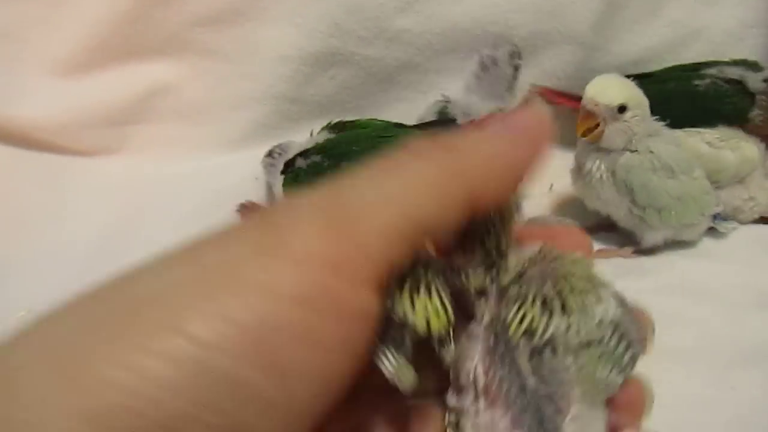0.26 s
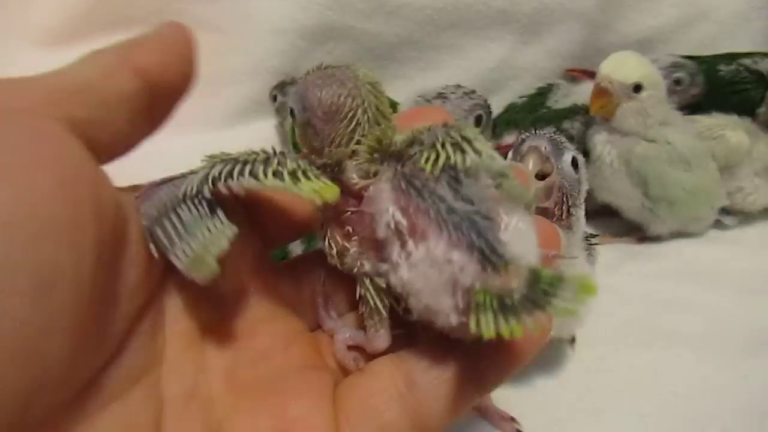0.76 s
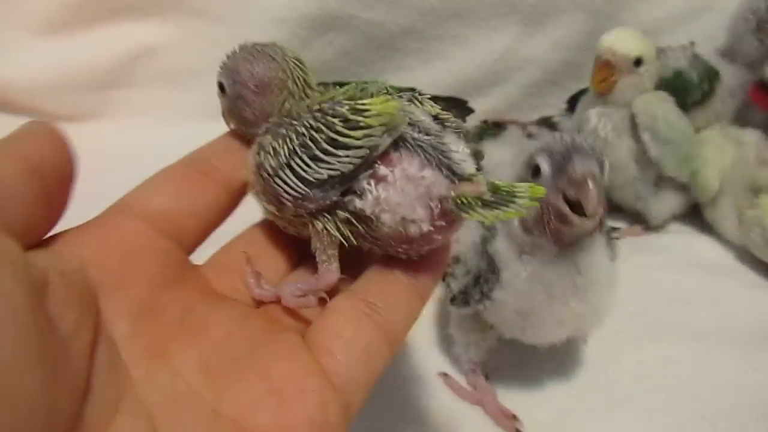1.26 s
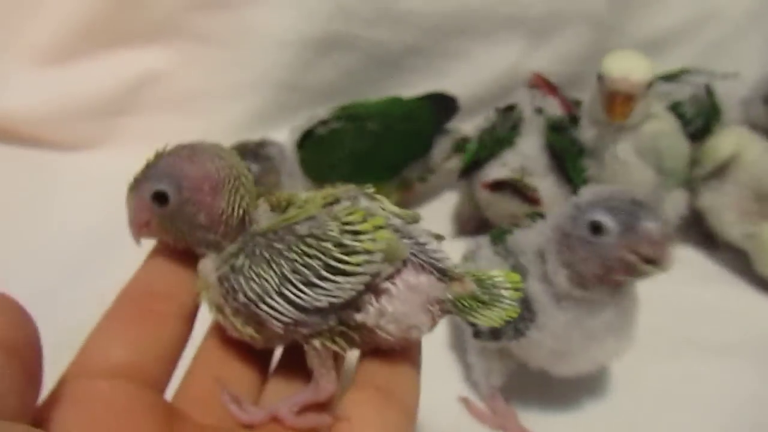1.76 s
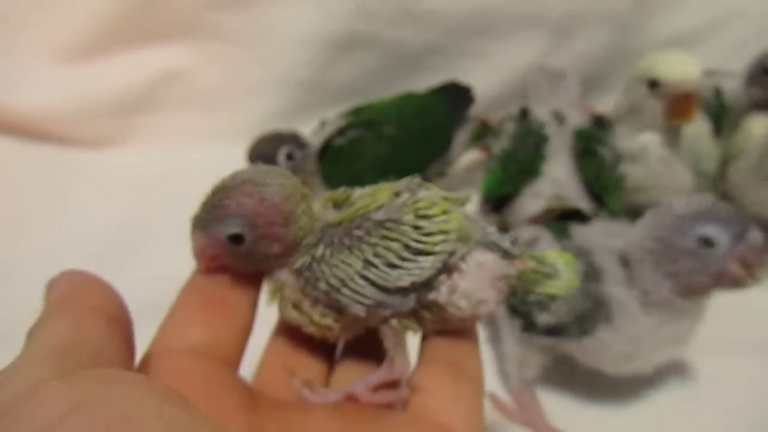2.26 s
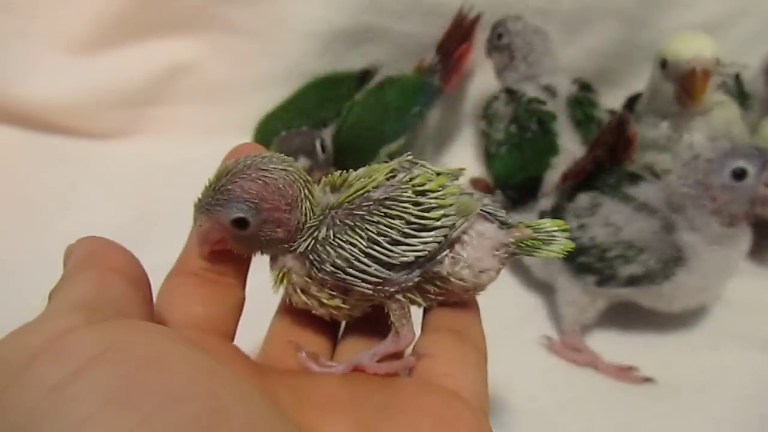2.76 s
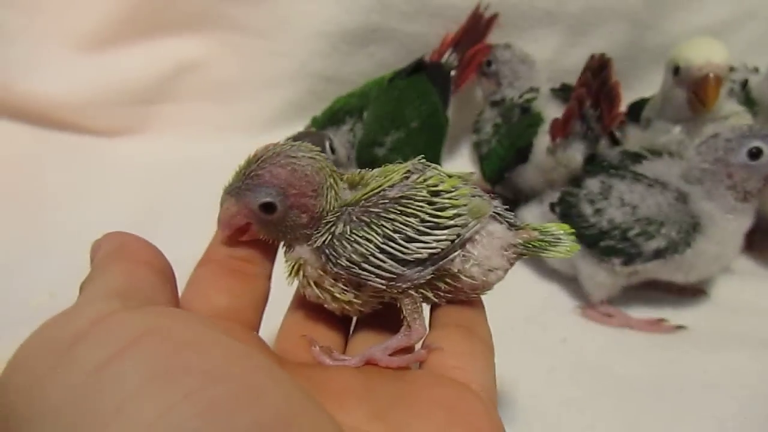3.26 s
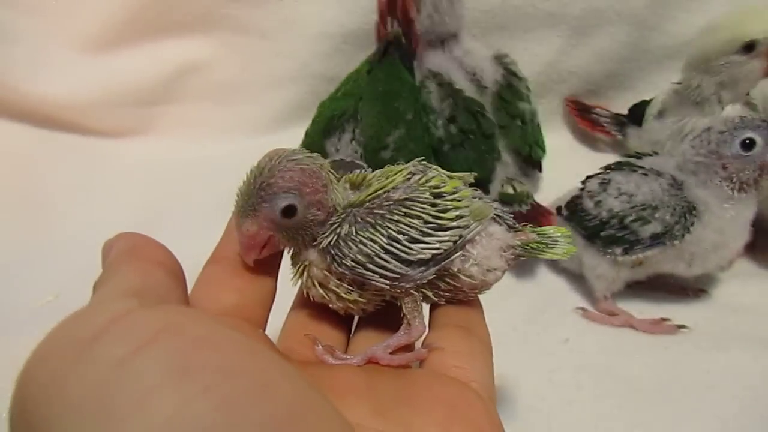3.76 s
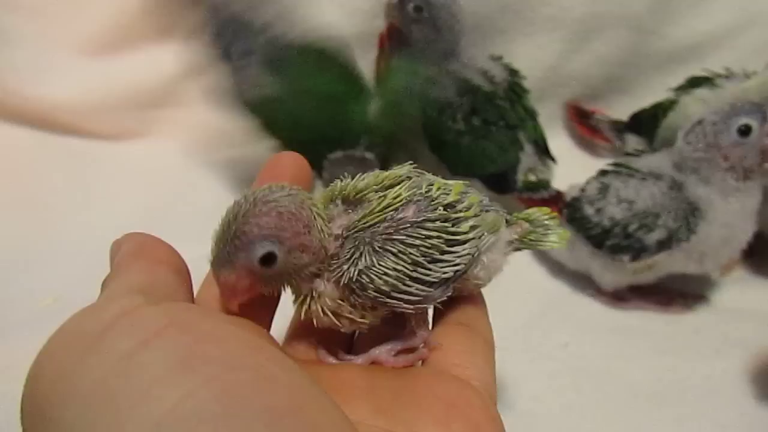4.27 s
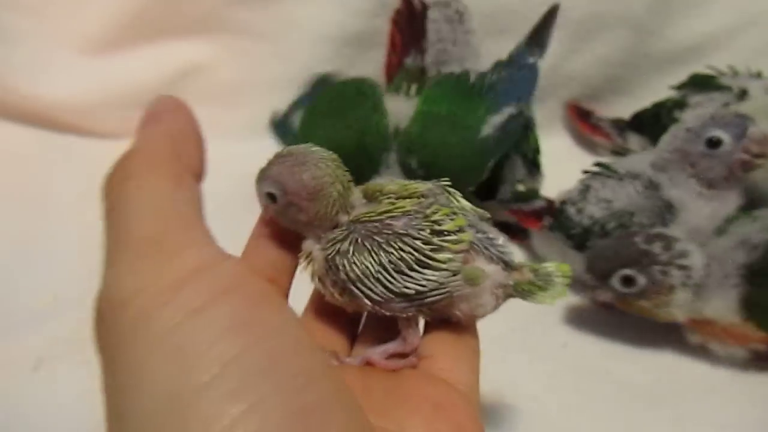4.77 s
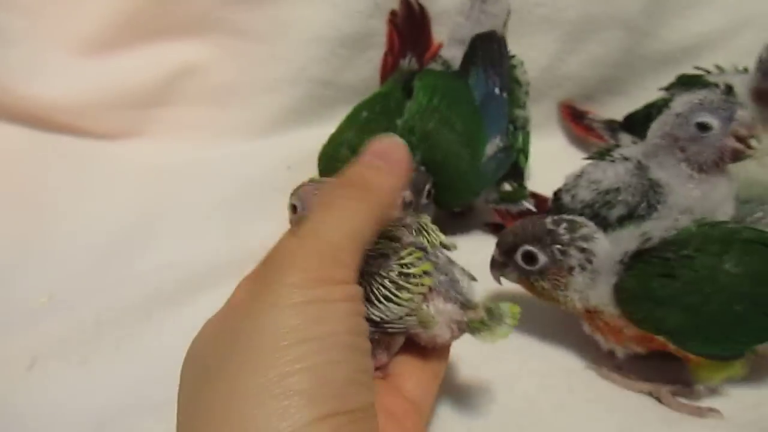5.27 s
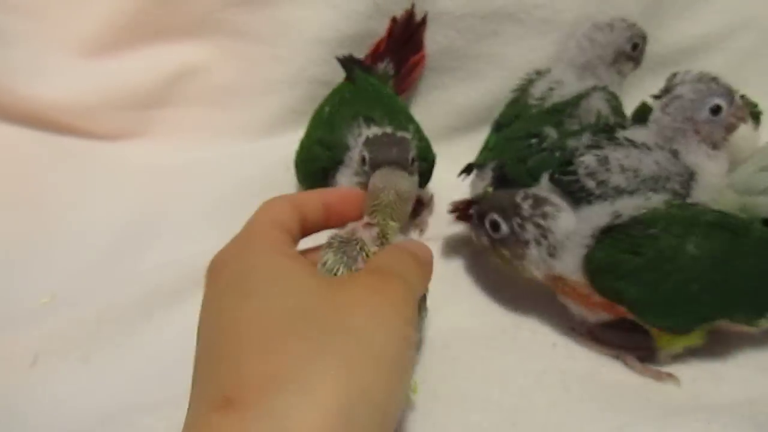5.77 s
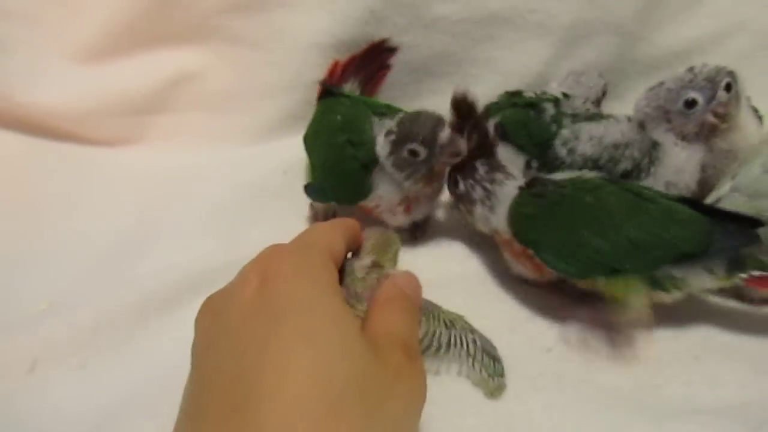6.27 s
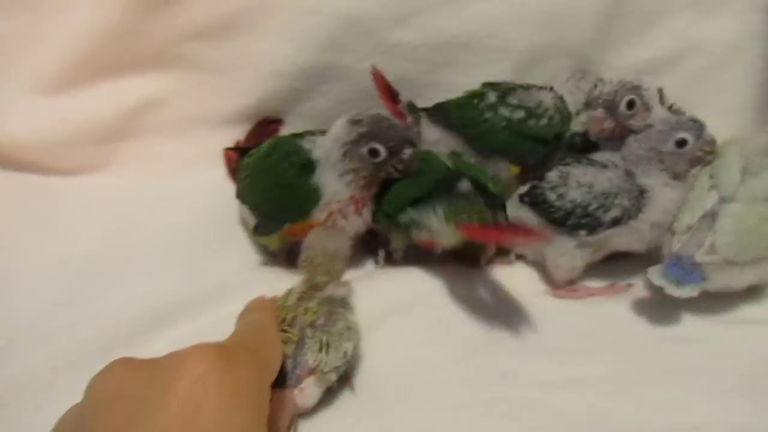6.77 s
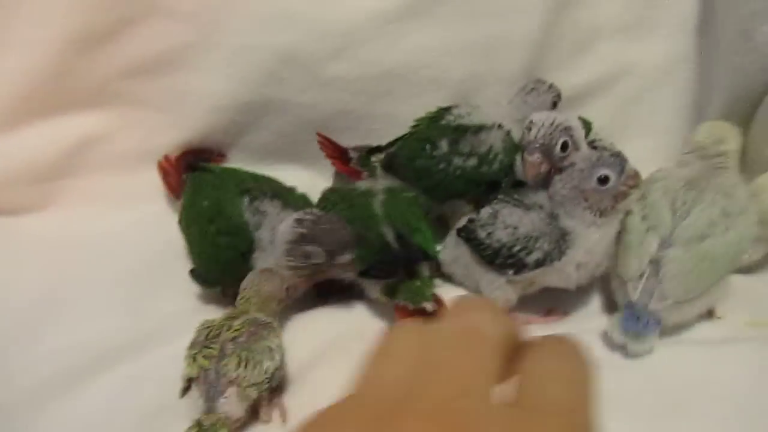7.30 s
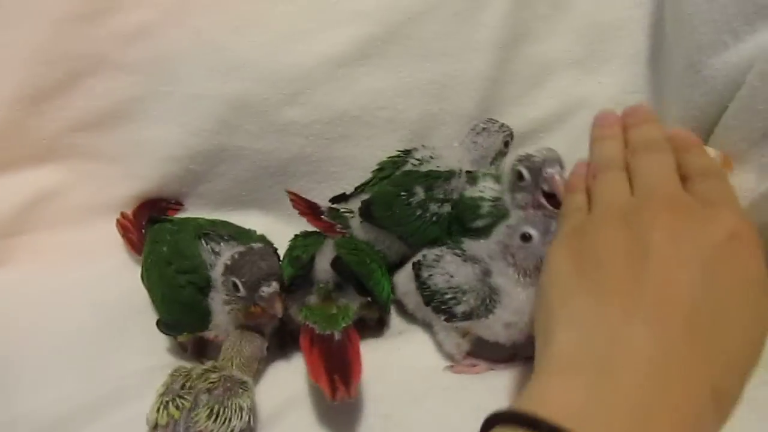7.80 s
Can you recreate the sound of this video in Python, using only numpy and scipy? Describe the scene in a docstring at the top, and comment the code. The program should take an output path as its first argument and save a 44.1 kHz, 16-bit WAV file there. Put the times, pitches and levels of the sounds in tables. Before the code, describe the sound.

Begging parrot chicks, close to the microphone in a small room with faint steady hiss. It opens mid-squawk: harsh, raspy notes follow one another until about 0.3 s, then two short clearer cries, and weak thin whines near 0.6 s. From 0.95 to 1.3 s comes a dense, very loud, piercing run with croaky low notes between, then small cries and a softer squawk near 1.6 s. After a pause, a whine rises and falls at 2.2 s into four rasping squawks until 2.7 s. Soft cloth taps and an isolated whine at 3.2 s precede another four squawks, 3.85-4.15 s. A whine at 4.6 s and muffled shuffling and thuds around 4.4-5 s lead to a rapid cluster from 5.2 to 5.7 s. More raspy groups come at 6.25-6.7 s and 6.9-7.2 s, then bright, loud squawks from 7.55 to 7.85 s and two weaker, rougher ones by 8 s.

```python
"""Begging parrot brood

A brood of young parrots begs on a cloth in a small room, close to the microphone, with a hand among them.
Whines, cries and squawks are pulse trains from a syrinx, ringing in the resonances of throat and beak:
thin gliding whines, short arching cries, and harsh arching squawks, the loudest clipped by the recorder.
Feet and fingers make filtered-noise taps and shuffles on the bedding, over steady room noise and hiss."""
import sys
import numpy as np
from scipy import signal
from scipy.fft import rfft, irfft
from scipy.io import wavfile
from scipy.ndimage import uniform_filter1d, map_coordinates

SR = 44100
rng = np.random.default_rng(int(sys.argv[2]) if len(sys.argv) > 2 else 0)


def master(y):
    """Save y as 16-bit WAV."""
    cut = np.clip(np.atleast_2d(y).T, -1, 1)
    pcm = np.round(cut * 32767)  # scale
    wavfile.write(sys.argv[1], SR, pcm.astype(np.int16))


N = 354519

# spectrum of the room noise: f/Hz, relative density level/dB
NOISE_SPECTRUM = [(20, -16), (45, -7), (90, 0), (180, -0.5), (400, -4), (700, -7.5), (1500, -11.5),
                  (3000, -15.5), (4000, -25.5), (6000, -17.5), (9000, -23.5), (11500, -28), (15000, -50.5)]
# stereo width of the room noise: f/Hz, side over mid level/dB
NOISE_WIDTH = [(60, 3.5), (140, 9.5), (320, 10.5), (750, 6), (1730, 3), (4010, -10.5), (9280, -4)]
# rumble of shuffling on the cloth: t/s, relative level/dB
SHUFFLE = [(0.0, -57), (0.65, -62), (1.07, -60.5), (1.34, -66), (2.59, -66), (2.87, -68.5), (4.45, -58.5),
           (4.95, -51), (5.96, -61.5), (6.33, -52.5), (7.57, -53.5), (8.04, -61)]
# decay of the room's tail: f/Hz, T60/s
ROOM_T60 = [(500, 0.27), (2000, 0.26), (6000, 0.19), (14000, .22)]
# taps on the bedding: t/s, thud relative level/dB, claw tick relative level/dB
TAPS = [(2.726, -44.5, -68.5), (2.912, -47, -71), (3.487, -40.5, -63.5), (3.527, -66.5, -42.5),
        (4.419, -49, -51), (4.434, -39, -42.5), (4.784, -43, -61.5), (4.881, -35, -58), (4.927, -55, -43.5),
        (5.002, -44, -51), (5.044, -41, -61.5), (7.299, -43.5, -51), (7.475, -40, -46)]

# resonances of throat and beak, nearly shut and wide open: f/Hz, level/dB
NARROW_BEAK = [(300, -44.5), (600, -5), (950, -2.5), (1400, -5.5), (2300, -4.5), (3700, -9), (5600, -1),
               (7000, -4), (9000, -18), (12000, -39), (16000, -60)]
OPEN_BEAK = [(300, -40.5), (570, -19.5), (800, -3), (980, -2), (1270, -15.5), (1700, -6), (2200, -11),
             (3250, 1.5), (4100, -10.5), (5150, -0.5), (6700, -3), (8200, -9.5), (10000, -20.5),
             (16000, -46)]
THROAT_HZ = 3250  # main resonance of the open beak as tabled
VOICE_LOW_HZ = 400  # the small throats give little below this

# rising whines: start t/s, end t/s, shelf pitch f/Hz, level/dB, brightness level/dB
RISING_WHINES = [(.574, .603, 2277, -34, -9.5), (2.193, 2.234, 2160, -26, 0),
                 (3.19, 3.228, 2286, -31.5, -1), (3.725, 3.775, 3040, -30, -4.5),
                 (4.533, 4.573, 2170, -27.5, -3.5), (5.111, 5.17, 2222, -28, -5.5),
                 (5.788, 5.834, 2340, -34, -4), (6.953, 6.978, 2530, -27, -3.5),
                 (7.492, 7.529, 2280, -29, -6)]
RISE_FROM, RISE_TO = .5, 1.22  # first and last pitch as shares of the shelf pitch
RISE_RASP, RISE_END_RASP, RISE_SWELL_DB = .99, .096, 3.0  # it clears and grows as it climbs
# falling whines: start t/s, end t/s, first pitch f/Hz, level/dB, start-to-end swell level/dB,
# brightness level/dB
FALLING_WHINES = [ (0.609, 0.687, 2550, -34.5, 6.5, -6), (0.692, .722, 2430, -33.5, -3, -3.5),
                  (0.929, 0.95, 2400, -22, 8.5, 0), (1.3, 1.325, 2684, -34, -10, -18),
                  (1.575, 1.594, 2300, -27, 16, -3), (1.648, 1.687, 2395, -34.5, -1, -2.5),
                  (2.241, 2.323, 2663, -23.5, 6.5, 2), (2.501, 2.525, 2630, -28.5, -1, 0),
                  (3.237, 3.312, 2613, -27, 6.5, 4), (3.316, 3.344, 2426, -26, 1, 4),
                  (3.766, 3.801, 2200, -37, -5.5, -15), (3.924, 3.975, 2410, -30, 6, 1),
                  (4.586, 4.664, 2367, -24, 1.5, 3), (4.674, 4.693, 1997, -37, -2, -3),
                  (5.176, 5.242, 2616, -26, -2, -1.5), (6.504, 6.529, 2640, -31.5, -4, -2),
                  (6.984, 7.002, 2600, -25.5, 6, 3), (7.065, 7.09, 2230, -31, 5, -4),
                  (7.538, 7.574, 2594, -30.5, -7, -6)]
REST_HZ, SAG_S = 1714, .021  # pitch it sags towards, and the time constant
FALL_RASP, RASP_AFTER_S, RASP_PER_S = .08, .0072, 14  # it starts nearly clean and then frays
RALLY_AFTER_S, RALLY_HZ_PER_S = .064, 22000  # if it lasts, an upward glide joins in

# short arching cries, mostly clear: start t/s, end t/s, top pitch f/Hz, droop at the start/share,
# level/dB, rasp/0-1, brightness level/dB
CRIES = [(0.117, 0.16, 1622, 0.06, -20, 0, -12), (0.359, 0.406, 1317, 0.38, -14.5, 0.14, -3.5),
         (0.454, .49, 1293, 0.38, -16.5, 0.1, -5), (1.39, 1.429, 1550, .17, -24.5, .03, -12),
         (1.468, 1.535, 1242, .16, -16, .1, 1.5), (3.798, 3.838, 2780, 0.35, -29.5, 0.35, -4),
         (5.876, 5.909, 1790, 0.3, -32.5, 1, -2), (6.175, 6.226, 3200, 0, -42, 0.7, -5.5)]
CRY_CREST, CRY_END_DROOP = .48, 1.2  # crest as share of the length; end droop over start droop

# squawks: start t/s, end t/s, top pitch f/Hz, level/dB, start-to-end swell level/dB, rasp drive/0-1,
# period doubling drive/0-1, brightness level/dB, main throat resonance f/Hz
SQUAWKS = [ (-.03, .034, 1640, -9.5, -11, 0.88, 0.45, -1, 3190),
           (.055, .15, 1697, -10.5, -5, .8, 0.18, -1.5, 3210),
           (.16, 0.221, 1738, -15, 5.5, 0.74, .29, -2, 3260),
           (0.224, 0.318, 1928, -17, 7.5, 0.83, 0.2, -4, 3170),
           (0.941, .998, 1712, -13, -5.5, 0.68, 0.16, -1.5, 3240),
           (.997, 1.072, 1915, -6.5, 2, .24, 0.5, 4, 3210),
           (1.065, 1.108, 555, -19, 2, 0.23, 0.24, -5, 3230),
           (1.104, 1.158, 1922, -6, 3, .38, 0.3, 5, 3190),
           (1.166, 1.205, 890, -18, 6.5, 0.87, .1, 3.5, 3080), (1.2, 1.26, 1886, -7, -1, .44, 0.2, 4, 3233),
           (1.262, 1.33, 560, -30, -8, .2, 0, -8, 3200),
           (1.278, 1.314, 1671, -23, 10.5, 0.73, 0.2, -1, 3200),
           (1.584, 1.657, 1547, -17, -0.5, .3, 0.17, -3, 3370),
           (2.312, 2.377, 1700, -10.5, -2, 0.8, 0.26, .5, 3310),
           (2.416, 2.485, 1677, -9.5, -0.5, 0.6, .2, 1, 3300),
           (2.524, 2.621, 1784, -11.5, 0.5, 0.6, .22, 1.5, 3320),
           (2.631, 2.693, 1836, -12, 6.5, .62, 0.46, 5.5, 3230),
           (3.853, 3.929, 1658, -11, -6, 0.9, 0.25, 0.5, 3250),
           (3.968, 4.056, 1671, -12.5, -6.5, 0.7, 0.2, 1, 3260),
           (4.07, 4.143, 1882, -11.5, 1, 0.8, .16, 1.5, 3300),
           (4.198, 4.266, 1756, -13.5, 1.5, 0.67, 0.2, 0.5, 3080),
           (5.24, 5.343, 1613, -12.5, -6, 0.71, 0.22, 1.5, 3280),
           (5.355, 5.412, 1685, -13.5, 1, 0.83, 0.14, 2.5, 3240),
           (5.408, 5.456, 2052, -10, 1, .18, 0.3, 5, 3290),
           (5.463, 5.518, 1590, -14, 2, 0.5, .13, 2.5, 3200),
           (5.517, 5.594, 1673, -10, -1, .41, .05, 4, 3295),
           (5.636, 5.7, 1737, -11.5, -5.5, 0.26, 0.14, 7, 3420),
           (6.244, 6.311, 1683, -14.5, 4, 0.67, 0.04, -2, 3370),
           (6.351, 6.408, 1738, -13.5, 5, 0.83, 0.03, -2.5, 3360),
           (6.404, 6.466, 1662, -16, 2.5, 0.76, 0.7, 2, 3110),
           (6.457, 6.505, 1650, -14.5, -0.5, 0.62, 0.04, -4.5, 3320),
           (6.526, 6.586, 1814, -10.5, 2, 0.63, 0.3, 5, 3280),
           (6.664, 6.689, 743, -20, 1, 0.12, 0.03, -5, 3190),
           (6.887, 6.959, 1667, -12, -5.5, 0.67, 0, 0.5, 3540),
           (6.998, 7.06, 1690, -12, -2.5, 0.73, 0, 1.5, 3420),
           (7.109, 7.17, 1586, -14.5, -4, 0.76, 0, 0, 3310),
           (7.566, 7.628, 1676, -7.5, -4, 0.37, 0.5, 6.5, 3350),
           (7.684, 7.743, 1800, -9, -1, 0.25, 0.57, 9.5, 3150),
           (7.79, 7.852, 1746, -7, 5.5, 0.52, 0.18, 5, 3240),
           (7.893, 7.947, 1652, -20, 1, 1, 0.3, 1.5, 3140),
           (7.987, 8.063, 1717, -19, -0.5, 1, 0.35, -1.5, 3270)]
# weight of the squawks' low partials: t/s, level/dB
CHEST = [(0, -5), (1.3, -3), (2.5, -2.5), (4, -1), (5.4, -0.5), (5.6, 3), (6.35, -1), (7.1, 1.5), (8, -1)]
# where the squawking bird sits: t/s, left over right level/dB
PAN = [(0, 0.2), (1, 0), (2.6, -0.5), (3.9, 0.5), (5.35, -0.8), (5.6, 0.5), (6.35, -0.5), (6.9, .5),
       (7.8, 0.1)]
# the arch: central pitch of its feet, central place of its crest (0-1), flatness of its top
EDGE_HZ, CREST, FLATNESS = 780, .57, 3.2
# largest shift of the crest (share of the length) and of the starting croak (share of its pitch)
CREST_SPREAD, EDGE_SPREAD = .14, .12
LOCK_S, LOCK_DEPTH = .012, .45  # averaging time of the beat's regularity, and its swing of the rasp

CUTOFF_HZ = 15700  # top of the recorder's range


def from_db(db):
    """Decibels to gain."""
    return 10 ** (np.asarray(db) / 20)


def rms_one(x):
    """Scale to unit power."""
    return x / np.sqrt(np.mean(x ** 2) + 1e-20)


def at_hz(points, hz):
    """Read a table along log frequency."""
    points = np.array(points)
    return np.interp(np.log(np.maximum(hz, 1)), np.log(points[:, 0]), points[:, 1])


def band(x, low_hz, high_hz):
    """Gentle band-pass."""
    edges = [low_hz, min(high_hz, SR / 2 - 1)]
    return signal.sosfilt(signal.butter(2, edges, "band", fs=SR, output="sos"), x)


def add(out, start, sound):
    """Mix a sound in at a time; what falls outside the scene is dropped."""
    i = int(start * SR)
    sound, i = sound[..., max(0, -i):], max(0, i)
    out[..., i:i + sound.shape[-1]] += sound[..., :max(0, N - i)]


def background(hiss_db=-50.0, shuffle_db=1.0, lumpy_db=3.0):
    """Steady room noise and hiss, wide in the bass, with the lumpy rumble of movement on the cloth."""
    hz = np.fft.rfftfreq(N, 1 / SR)
    mid, side = rfft(rng.standard_normal((2, N))) * from_db(at_hz(NOISE_SPECTRUM, hz))
    side = side * from_db(at_hz(NOISE_WIDTH, hz))
    steady = rms_one(irfft([mid + side, mid - side], N))

    rumble_db = np.interp(np.arange(N) / SR, *np.transpose(SHUFFLE))
    lumps = rms_one(signal.resample(rng.standard_normal(size=200), N))
    lumpy_noise = rng.standard_normal((2, N)) * from_db(lumpy_db * lumps)
    # the swelling is laid on before the band-pass
    rumble = rms_one(band(lumpy_noise, 77, 330))
    return from_db(hiss_db) * steady + from_db(rumble_db + shuffle_db) * rumble


def room(x, wet_db=-11.5, early_db=-11.5, early_t60=.073, gap=.0037):
    """Near surfaces answer almost at once; the walls leave a short tail that dies sooner in the treble."""
    t, edges = np.arange(SR // 2) / SR, np.geomspace(100, 20000, num=9)
    shared, own = rng.standard_normal(len(t)), rng.standard_normal((2, len(t)))
    share = .5
    # the two ports are close together, so only the treble differs between them
    own = band(own, 1500, 18000)
    echoes = (np.sqrt(share) * shared + np.sqrt(1 - share) * own) * (t > gap)
    tail = 0
    for low, high in zip(edges, edges[1:]):
        t60 = at_hz(ROOM_T60, np.sqrt(low * high))
        tail = tail + band(echoes, low, high) * from_db(-60 * t / t60)
    # the same noise backwards serves as a separate early pattern
    early = echoes[:, ::-1] * from_db(-60 * t / early_t60) * (t > gap / 2)
    response = from_db(wet_db) * rms_one(tail) + from_db(early_db) * rms_one(early)
    response = response / np.sqrt(len(t))
    return signal.fftconvolve(x[None], response, axes=1)[:, :N]


def taps(tick_t60=.022, thud_t60=.05, thud_gain_db=1.0, tick_gain_db=1.0):
    """A dull thud through the cloth with the tick of a claw on top: two decaying bands of noise."""
    out, t = np.zeros(N), np.arange(SR // 10) / SR
    for start, thud_db, tick_db in TAPS:
        thud = rms_one(band(rng.standard_normal(len(t)), 100, 340))
        thud = thud * from_db(thud_db + thud_gain_db - 60 * t / thud_t60)
        tick = rms_one(band(rng.standard_normal(len(t)), 600, 2300))
        tick = tick * from_db(tick_db + tick_gain_db - 60 * t / tick_t60)
        add(out, start, thud + tick)
    return out


def syrinx(pitch, doubling, rasp, jitter, waver, shimmer_db=2.0, limp=.1):
    """One sharp pulse per closure; alternate ones come weak and late, and rasp unsettles size and timing."""
    n = len(pitch)
    unsteady = rms_one(uniform_filter1d(rng.standard_normal(n), size=110))
    cycles = np.cumsum(pitch * (1 + waver * np.sqrt(rasp) * unsteady)) / SR
    k = np.arange(1, int(cycles[-1]))
    at = np.interp(k, cycles, np.arange(n))
    rough, weak = rasp[at.astype(int)], doubling[at.astype(int)] * (k % 2)

    # near chaos an uneven pattern of two to five closures recurs, gradually changing
    pattern, memory = rng.integers(2, 6), .68
    feedback = np.r_[1, np.zeros(pattern - 1), -memory]
    uneven = signal.lfilter([np.sqrt(1 - memory ** 2)], feedback, rng.standard_normal((2, n)))
    timing, size = uneven[:, -len(k):]
    at = at + (jitter * rough * timing + limp * weak) * SR / pitch[at.astype(int)]
    strength = (1 - weak) * from_db(shimmer_db * rough * np.clip(size, -2, 2))

    # windowed sincs place each pulse between samples
    near = at.astype(int)[:, None] + np.arange(-7, 9)
    offset = near - at[:, None]
    pulses = strength[:, None] * np.sinc(offset) * np.sinc(offset / 8)
    return np.bincount(np.clip(near, 0, n - 1).ravel(), pulses.ravel(), n)


def throat(pulses, shape, chest_db, bright_db, size=1024):
    """Every pulse rings causally in the resonances of throat and beak; the level is evened."""
    hz = np.fft.rfftfreq(size, 1 / SR)
    tilt = [(1800, chest_db), (2800, 0), (3600, .01), (5000, bright_db)]
    db = at_hz(shape, hz) + at_hz(tilt, hz)
    # folding the cepstrum gives minimum phase, so nothing rings ahead of its pulse
    cepstrum = irfft(np.log(from_db(db)))
    cepstrum[1:size // 2] *= 2
    cepstrum[size // 2 + 1:] = 0
    ringing = irfft(np.exp(rfft(cepstrum)))
    voice = signal.fftconvolve(pulses, ringing)[:len(pulses)]
    return voice / np.sqrt(uniform_filter1d(voice ** 2, size=400) + 1e-12)


def gate(stage, length, attack, release):
    """The air flow starts and stops within milliseconds."""
    return np.clip(stage * length / attack, 0, 1) * np.clip((1 - stage) * length / release, 0, 1)


def flutter(n, depth_db):
    """Quick uneven throbbing of the air flow, from smoothed noise."""
    smooth_walk = uniform_filter1d(np.cumsum(rng.standard_normal(n + 1)), size=130)
    return from_db(depth_db * rms_one(np.diff(smooth_walk)))


def locking(n):
    """The syrinx drifts in and out of a regular beat over milliseconds: a factor on the rasp."""
    drift = uniform_filter1d(rng.standard_normal(n + SR), size=int(LOCK_S * SR))
    return np.maximum(1 + LOCK_DEPTH * rms_one(drift)[:n], 0)


def whine(pitch, rasp, level_db, swell_db, bright_db, doubling=.51):
    """One high note through a nearly shut beak, between a clean whistle and a rasp."""
    stage, rough = np.linspace(0, 1, len(pitch)), np.clip(rasp, 0, 1)
    pulses = syrinx(pitch, np.clip(doubling * rough, 0, .95), rough, jitter=.14, waver=.022)
    air = .04 * rough * rng.standard_normal(len(stage))
    voice = throat(pulses + air, NARROW_BEAK, 0, bright_db)
    flow = gate(stage, len(stage) / SR, attack=.005, release=.0016) * flutter(len(stage), depth_db=3.0)
    return voice * from_db(level_db + swell_db * (stage - .5)) * flow


def rising_whines(shelf_at=.55):
    """The pitch leaps out of a rasp, rests on a shelf and flicks up at the end."""
    out = np.zeros(N)
    for start, end, shelf_hz, level_db, bright_db in RISING_WHINES:
        stage = np.linspace(0, 1, int((end - start) * SR))
        # cubing flattens the glide around the shelf
        bend = np.interp(stage, [0, shelf_at, 1], [-1, 0, 1]) ** 3
        pitch = shelf_hz * np.interp(bend, [-1, 0, 1], [RISE_FROM, 1, RISE_TO])
        rasp = np.interp(stage, [.2, .8], [RISE_RASP, RISE_END_RASP])
        add(out, start, whine(pitch, rasp, level_db, RISE_SWELL_DB, bright_db))
    return out


def falling_whines():
    """A nearly clean whistle sags and frays; the long ones rally at the end."""
    out = np.zeros(N)
    for start, end, first_hz, level_db, swell_db, bright_db in FALLING_WHINES:
        t = np.arange(int((end - start) * SR)) / SR
        sag = REST_HZ + (first_hz - REST_HZ) * np.exp(-t / SAG_S)
        rally = RALLY_HZ_PER_S * np.maximum(t - RALLY_AFTER_S, 0)
        rasp = FALL_RASP + RASP_PER_S * np.maximum(t - RASP_AFTER_S, 0)
        add(out, start, whine(sag + rally, rasp, level_db, swell_db, bright_db))
    return out


def cries(chest_db=0.0, edge_db=-8.0, flatness=2.9, doubling=.7, wobble=.025, wobble_hz=75):
    """The syrinx holds a more regular beat, so harmonics stand out while the pitch arches and wobbles."""
    out = np.zeros(N)
    for start, end, top_hz, droop, level_db, rasp, bright_db in CRIES:
        stage = np.linspace(0, 1, int((end - start) * SR))
        slack = np.abs(np.interp(stage, [0, CRY_CREST, 1], [-1, 0, 1])) ** flatness
        pitch = top_hz * (1 - droop * slack * np.where(stage < CRY_CREST, 1, CRY_END_DROOP))
        wobble_cycles = wobble_hz * stage * (end - start) + rng.random()
        pitch = pitch * (1 + wobble * np.sin(2 * np.pi * wobble_cycles))
        rough = np.full(len(stage), np.clip(rasp, 0, 1))
        pulses = syrinx(pitch, np.clip(doubling * rough, 0, .6), rough, jitter=.18, waver=.025)
        voice = throat(pulses, OPEN_BEAK, chest_db, bright_db)
        loudness = from_db(level_db + edge_db * (2 * stage - 1) ** 2)
        flow = gate(stage, end - start, attack=.005, release=.0022) * flutter(len(stage), depth_db=1.94)
        add(out, start, voice * loudness * flow)
    return out


def squawks(edge_db=-2.5, onset_db=-5.5, fade_db=-6.0, edge_dull_db=-4.5, slack_stretch=.94):
    """Pressure swells and falls: pitch arches up from a low croak; the crest is brighter and raspier."""
    out = np.zeros((2, N))
    for start, end, top_hz, level_db, swell_db, rasp, doubling, bright_db, throat_hz in SQUAWKS:
        stage = np.linspace(0, 1, int((end - start) * SR))
        # no two arches lean alike or start from the same croak
        lean, foot = rng.uniform(-1, 1, 2)
        crest = CREST + CREST_SPREAD * lean
        pressure = 1 - np.abs(np.interp(stage, [0, crest, 1], [-1, 0, 1])) ** FLATNESS
        edge_hz = min(EDGE_HZ * (1 + EDGE_SPREAD * foot), .9 * top_hz)
        pitch = edge_hz + (top_hz - edge_hz) * pressure

        rough = np.clip(rasp * (.5 + .5 * pressure) * locking(len(stage)), 0, 1)
        alternation = np.clip(doubling * pressure ** 2, 0, .95)
        pulses = syrinx(pitch, alternation, rough, jitter=.18, waver=.036)
        pulses = pulses + .02 * rough * rng.standard_normal(len(stage))  # breath

        # the resonances lie lower and duller while the throat is slack
        shape = np.array(OPEN_BEAK) * [throat_hz / THROAT_HZ, 1]
        slack_shape = shape * [slack_stretch, 1]
        chest_db = np.interp(start, *np.transpose(CHEST))
        pressed = throat(pulses, shape, chest_db, bright_db)
        slack = throat(pulses, slack_shape, chest_db - edge_dull_db, bright_db + edge_dull_db)
        voice = pressure * pressed + (1 - pressure) * slack

        arch_db = np.where(stage < .5, onset_db, fade_db) * (2 * stage - 1) ** 2
        foot_db = edge_db * (1 - pressure) ** 2
        loudness = from_db(level_db + swell_db * (stage - .5) + arch_db + foot_db)
        flow = gate(stage, end - start, attack=.006, release=.0068) * flutter(len(stage), depth_db=1.5)
        pan_db = np.interp(start, *np.transpose(PAN))
        add(out, start, voice * loudness * flow * from_db([[pan_db / 2], [-pan_db / 2]]))
    return out


def scene(lag_samples=.57):
    """The birds sit a little to the right, so the left port hears them slightly later."""
    voices = squawks() + cries() + rising_whines() + falling_whines()
    low_cut = signal.butter(2, VOICE_LOW_HZ, "high", fs=SR, output="sos")
    left, right = signal.sosfilt(low_cut, voices + 1e-18) + taps()
    late_left = map_coordinates(left, [np.arange(N) - lag_samples], order=3)
    direct = np.array([late_left, right])
    return direct + room((left + right) / 2) + background()


def record(dry, ceiling=.97):
    """The loudest peaks are clipped; then the deepest bass and the top are cut."""
    clipped = np.clip(dry, -ceiling, ceiling)
    bass_cut = signal.butter(1, 80, "high", fs=SR, output="sos")
    top_cut = signal.ellip(10, .1, 70, CUTOFF_HZ, fs=SR, output="sos")
    return signal.sosfilt(top_cut, signal.sosfilt(bass_cut, clipped))


dry = scene()
out = record(dry)
master(out)
```